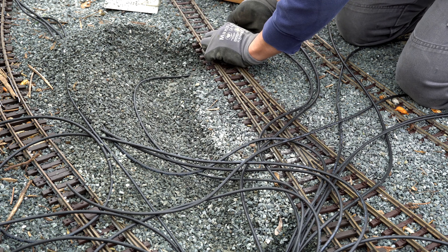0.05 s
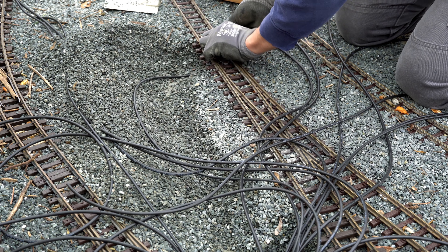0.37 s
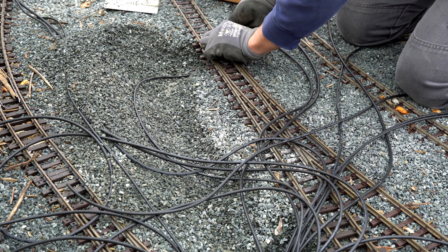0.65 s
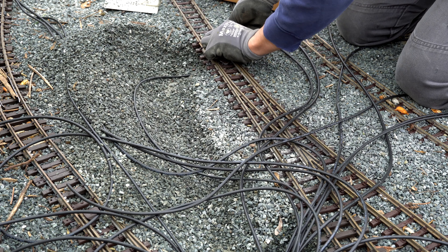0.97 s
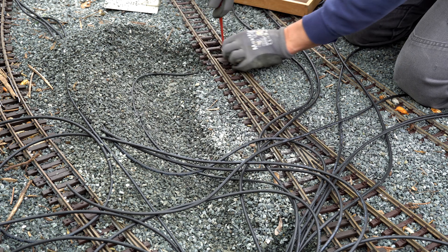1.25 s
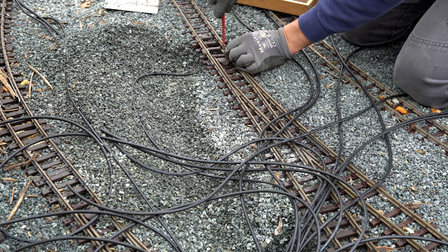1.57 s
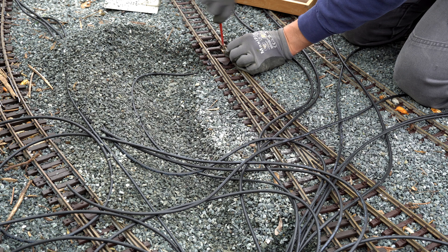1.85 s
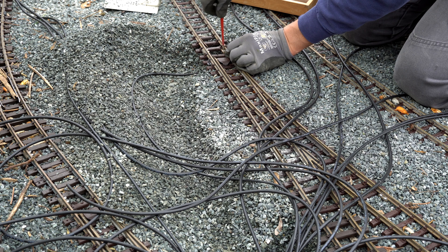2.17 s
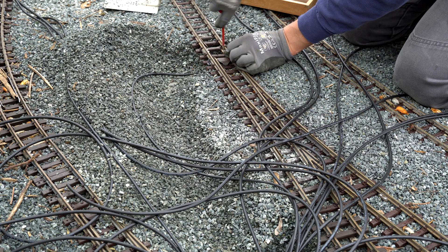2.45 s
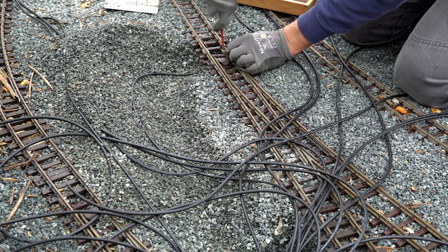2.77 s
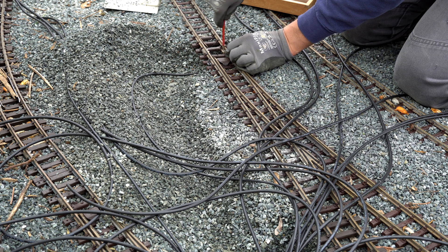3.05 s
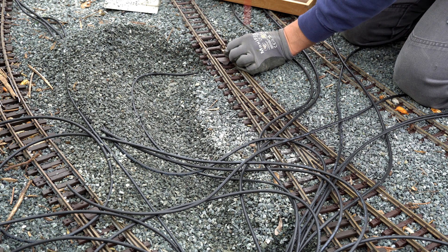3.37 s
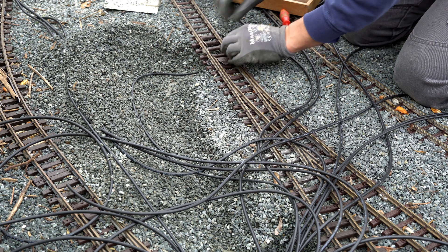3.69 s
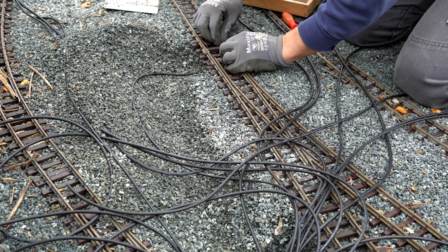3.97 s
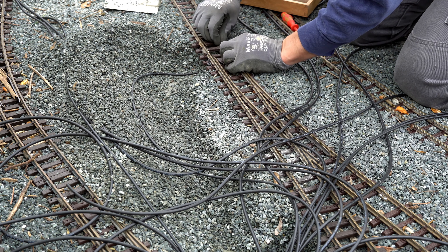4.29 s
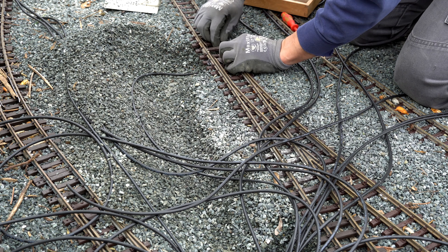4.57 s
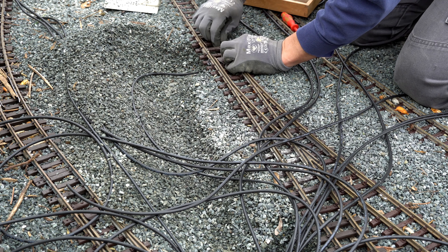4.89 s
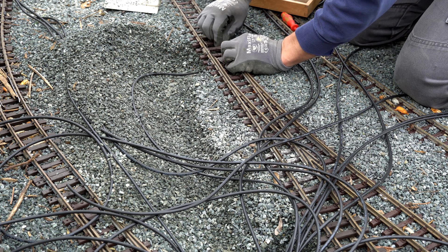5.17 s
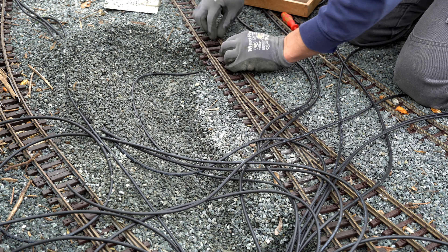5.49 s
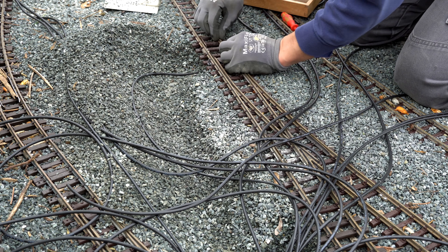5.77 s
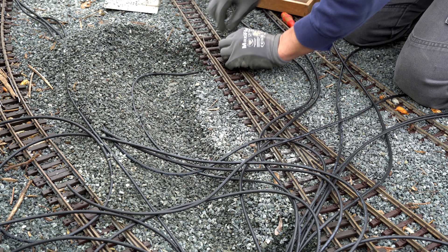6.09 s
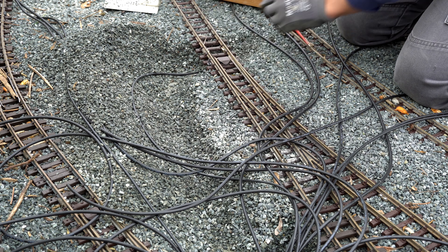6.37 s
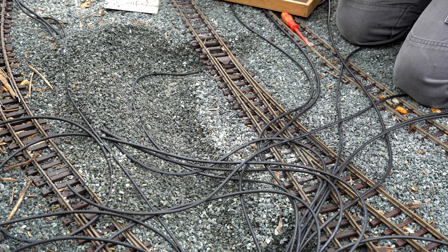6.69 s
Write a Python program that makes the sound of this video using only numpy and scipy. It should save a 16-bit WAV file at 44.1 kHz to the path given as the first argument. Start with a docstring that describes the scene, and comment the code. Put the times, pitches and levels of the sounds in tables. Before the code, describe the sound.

Sparrows chirp while a screw creaks through four turns, then a screwdriver clatters into a wooden tray and gravel clicks softly.

```python
"""Beside a garden railway, one microphone close to the track. Sparrows call from the start, other birds
whistle far off, and gloved fingers stir the ballast as a sleeve brushes past. From 1.6 s a screw is
tightened into the track: four turns, each a stick-slip creak that ends slower. At 3.6 s the screwdriver,
tossed into a wooden tray, lands and bounces. Then fingers click rail and stones again while gusts reach
the microphone."""
import sys
import numpy as np
from scipy import signal
from scipy.fft import rfft, irfft
from scipy.io import wavfile

SR = 44100
rng = np.random.default_rng(int(sys.argv[2]) if len(sys.argv) > 2 else 0)


def store_wav(level_fs):
    """Save 16-bit WAV to argv[1]."""
    pcm = np.round(np.clip(np.atleast_2d(level_fs), -1, 1) * 32767)
    wavfile.write(sys.argv[1], SR, pcm.T.astype(np.int16))


N = 301644
TIME = np.arange(N) / SR

# The garden's hush. Each row: frequency in Hz, relative level in dB.
AIR_COLOUR = [(15, -27), (35, -25), (65, -20.5), (110, -26), (200, -30.5), (400, -34), (700, -35.5),
              (1300, -39), (2500, -43.5), (4000, -49), (5600, -48), (8200, -51.5), (10000, -57.5),
              (16000, -58.5)]
# Its course. Each row: time in seconds, level in dB.
AIR_LEVELS = [(1.0, -51.5), (1.5, -53.5), (3.4, -52), (6.84, -54)]

# Sparrow notes. Each row: seconds into the note, share of the top pitch, relative level in dB.
CHEEP_SHAPE = [(0, .76, -16), (.016, 1, -1), (.028, .98, 0), (.043, .83, -1.5), (.052, .71, -5),
               (.06, .75, -3.5), (.072, .7, -3), (.084, .58, -10)]  # an arch that steps down with one catch
TWEET_SHAPE = [(0, .68, -10), (.035, 0.95, 1), (.09, .92, -7)]  # rises and holds
CHIRRUP_SHAPE = [(0, .62, -16), (.016, .88, -1), (.027, 0.98, -1), (.038, .85, 0.5), (.05, .62, -8),
                 (.057, .74, -1), (.068, .82, -6.5), (.1, 0.57, -13.5)]  # two quick arches
FLICK_SHAPE = [(0, 1, -19.5), (.025, 1.23, -10.5), (.04, 1.36, -26)]  # a high voice leading into chirrups and cheeps
# Calls near the microphone. Each row: start in seconds, top pitch in Hz, level in dB.
CHEEP_CALLS = [(0, 3930, -46), (.125, 4400, -53.5), (0.659, 4400, -42.5), (1.411, 4620, -54),
               (2.843, 4340, -36), (4.055, 4310, -40.5), (4.182, 4960, -52), (5.295, 4450, -58.5),
               (5.405, 4510, -39), (5.628, 4450, -50.5), (5.989, 4160, -38.5)]
TWEET_CALLS = [(.735, 4436, -44), (.756, 3655, -36.5), (1.574, 3400, -43.5), (6.26, 4360, -55),
               (6.342, 4440, -51.5)]
CHIRRUP_CALLS = [(1.866, 4910, -35), (2.265, 4420, -47.5), (3.246, 4850, -34.5), (6.411, 4930, -37.5)]
# Held tones that slide down. Each row: start and length of the slide in seconds, top pitch in Hz,
# fall in octaves per second, level in dB, relative level of the held tone in dB.
SLUR_CALLS = [(0.388, .055, 6050, 12.6, -27.5, -25), (.455, 0.073, 3710, 12.8, -32, -21),
              (0.454, .06, 5760, 8, -41, -20), (1.106, 0.16, 6185, 9.46, -30, -16),
              (2.463, 0.1, 6260, 10.5, -36, -20), (3.56, 0.091, 5730, 11, -36.5, -25),
              (3.822, 0.083, 5400, 12, -52.5, -7), (4.412, .15, 5980, 9.85, -34, -20)]

# Rail and stones under the fingers. Each row: time in seconds, level in dB.
STONE_CLICKS = [(0.016, -29), (0.268, -24.5), (.278, -29.5), (0.4907, -28), (0.9799, -32.5), (1.3812, -39),
                (1.606, -42), (3.2701, -28.5), (3.279, -29.5), (3.285, -28), (3.884, -36), (4.2753, -42.5),
                (4.829, -24), (4.8305, -20), (4.836, -26.5), (4.844, -30.5), (4.863, -37.5), (4.96, -59),
                (4.979, -60), (5.1438, -39.5), (5.5035, -37.5), (5.691, -33)]
# Close movements. Each row: middle in seconds, length in seconds, level in dB.
BALLAST_RUBS = [(.03, 0.45, -54), (.5, 0.46, -60.5), (.95, 0.68, -60), (4.1, 0.62, -58), (4.6, .12, -57.5),
                (4.97, 0.065, -47.5), (5.15, 0.19, -56.5), (5.88, 0.21, -58)]
SLEEVE_MOVES = [(.85, 1.2, -56.5)]
# What is touched. Each row: frequency in Hz, relative level in dB.
STONE_COLOUR = [(100, -11.5), (300, -5), (600, 2.5), (1500, -0.5), (3000, 2.5), (6000, 0.5), (8300, -0.5),
                (9500, -10), (12000, -14.5), (14300, -14), (16000, -24.5)]
GRIT_COLOUR = [(100, -25.5), (300, -8.5), (700, 2.5), (1500, -1), (4000, -6), (8300, -12.5), (9800, -18),
               (16000, -23)]
CLOTH_COLOUR = [(100, -9), (200, 6.5), (400, -4), (1200, -0.5), (2200, -5), (4000, -10), (16000, -46)]

# Birds far off. Each row: start and end in seconds, first and last pitch in Hz, level in dB.
FAR_WHISTLES = [(.5, .76, 2200, 2120, -54.5), (0.783, 1.22, 2450, 2380, -64.5),
                (1.4, 1.64, 2050, 1980, -62), (2.702, 2.828, 5035, 5380, -53),
                (2.92, 3.01, 5264, 5370, -53), (4.024, 4.3, 2290, 2460, -56),
                (5.038, 5.185, 4950, 4960, -56.5), (5.075, 5.208, 2130, 1996, -59.5),
                (5.331, 5.412, 4720, 4390, -50), (5.345, 5.43, 1834, 1690, -57),
                (5.324, 5.43, 2630, 2470, -60), (5.566, 5.686, 2200, 2230, -56.5),
                (6.022, 6.147, 5580, 5620, -62), (6.464, 6.66, 6330, 6160, -62),
                (6.485, 6.581, 5390, 5120, -53.5)]

# Turns of the screw. Each row: start and end in seconds, nominal slips per second at first and at last,
# levels of the breakaway, next and last slips in dB, treble lift in dB, the sleeper's share in dB.
SCREW_TURNS = [(1.639, 1.7076, 1280, 164, -35, -31, -18.5, -7, -10),
               (2.0273, 2.1424, 906, 130, -17.5, -23.5, -9.5, 0.5, -8.5),
               (2.5175, 2.64, 218, 158, -10.5, -14.5, -11.5, 6, -8),
               (3.016, 3.1031, 195, 10.5, -10.5, -18, -13, 5.5, -7)]
# The screw's snap and the sleeper's after-ring. Each row: frequency in Hz, relative level in dB.
SCREW_COLOUR = [(200, -39), (500, -18.5), (750, -15), (2000, -30.5), (2500, -5), (4000, -13), (6900, -11),
                (7600, 3), (8600, 6.5), (9300, 0.5), (10100, -16), (11000, -8.5), (12200, -11.5),
                (13900, -30.5), (15500, -25)]
SLEEPER_COLOUR = [(200, -14), (500, -27), (720, -3), (1200, 0.5), (1900, -0.5), (2500, -4), (4000, -1.5),
                  (6000, 0.5), (9000, -5.5), (10500, -1), (12200, -6), (14000, -9), (16000, -16)]

# The screwdriver lands. Each row: time in seconds, level in dB, treble cutoff in Hz, shaft tick in dB.
TOOL_BOUNCES = [(3.5993, 2.5, 4800, -18.5), (3.602, -3.5, 3450, -14), (3.613, -7, 2490, -20),
                (3.669, -9.5, 1130, -20), (3.7255, -18.5, 825, -40), (3.736, -21.5, 1015, -37),
                (3.7589, -24, 1100, -42), (3.78, -39, 1016, -49), (3.811, -25.5, 890, -48),
                (3.844, -29.5, 690, -50), (3.9036, -31.5, 860, -44.5), (3.9621, -35, 600, -58),
                (4.0108, -19.5, 2230, -27), (4.036, -36, 1480, -39), (4.0538, -32, 1800, -38.5)]
# Wooden tray and steel shaft ring. Each row: frequency in Hz, relative level in dB, t60 in seconds.
WOOD_MODES = [(628.5, -23.5, 0.26), (787, -13.5, 0.11), (868, -5.5, 0.069), (1125, -6.5, 0.077),
              (1238, -7, 0.048), (1394, -3, 0.066), (1747, 7, 0.022), (1997, -8, 0.081), (2400, -4, 0.055),
              (2560, -7, 0.076), (2886, 5, 0.013), (3140, -13.5, .05), (3663, -3.5, 0.06),
              (4400, -9.5, 0.071)]
STEEL_MODES = [(7750, -2, .35), (11100, -3, .3), (15000, -2, .25)]
# Clatter on the tray. Each row: frequency in Hz, relative level in dB.
TRAY_COLOUR = [(60, -15.5), (170, -31.5), (240, -12), (330, -34), (450, -12), (700, 1), (1050, 6),
               (1900, 0.5), (2800, 0), (4500, -8.5), (8000, -24), (11000, -40), (16000, -44.5)]

# Wind on the microphone. Each row: middle in seconds, length in seconds, level in dB.
MIC_GUSTS = [(4.12, .8, -37.5), (4.36, 0.58, -32.5), (5.08, 1.29, -28), (6.0, 1.38, -27), (6.62, 0.54, -28)]
# Its rumble. Each row: frequency in Hz, relative level in dB.
GUST_COLOUR = [(2, -17), (7, -2.5), (14, 0.5), (30, -18.5), (60, -30.5), (120, -35), (300, -73),
               (1000, -100)]


def gain_of(db):
    """Decibels to gain."""
    return 10 ** (np.asarray(db) / 20)


def evened(x):
    """Scales to rms 1."""
    return x / np.sqrt(np.mean(x ** 2) + 1e-20)


def unit_hit(x):
    """Scales a hit to the energy of one millisecond at rms 1."""
    return x * np.sqrt(SR / 1000 / np.sum(x ** 2))


def spectrum(points, size):
    """Gains of a (Hz, dB) table on the bins of an FFT."""
    hz, db = np.transpose(points)
    return gain_of(np.interp(np.log(np.fft.rfftfreq(size, 1 / SR) + 1), np.log(hz + 1), db))


def noise(points):
    """Steady noise with the given spectrum, at rms 1."""
    return evened(irfft(rfft(rng.standard_normal(N)) * spectrum(points, N), N))


def wander(t, per_s):
    """A smooth random curve of rms 1."""
    return evened(signal.resample(rng.standard_normal(int((t[-1] - t[0]) * per_s) + 3), len(t)))


def swells(rows):
    """Gain over time of events that each rise and fall smoothly."""
    return sum(gain_of(db) * np.cos(np.pi * np.clip((TIME - middle) / length, -.5, .5)) ** 2
               for middle, length, db in rows)


def add(mix, s, sound):
    """Mixes a sound in at s seconds."""
    part = mix[max(round(s * SR), 0):][:len(sound)]
    part += sound[:len(part)]


def impact(colour, t60, scatter_db, spread_s=0.000698, size=4096):
    """A causal pulse of the given colour, followed by the dense dying ring of the struck thing."""
    cepstrum = irfft(np.log(spectrum(colour, size)))
    cepstrum[1:size // 2] *= 2
    cepstrum[size // 2 + 1:] = 0
    # bending waves are dispersive: the treble arrives first
    lag = 2 * np.pi * np.cumsum(np.linspace(spread_s, 0, size // 2 + 1)) * SR / size
    pulse = irfft(np.exp(rfft(cepstrum) - 1j * lag))
    ring = rng.standard_normal(size) * gain_of(-60 * np.arange(size) / SR / t60)
    ring *= gain_of(scatter_db) / np.linalg.norm(ring)
    ring[0] = 1
    return unit_hit(signal.fftconvolve(pulse, ring)[:size])


def garden(x, t60, build_s):
    """Scattered reflections reach the microphone from fences, walls and shrubs."""
    t = np.arange(SR) / SR
    taps = rng.standard_normal(SR) * (rng.random(SR) < .06)
    taps *= np.minimum(t / build_s, 1) ** 2 * gain_of(-60 * t / t60)
    return signal.oaconvolve(x, taps / np.linalg.norm(taps))[:N]


def air():
    """The hush of the garden all round, drifting a little in level."""
    return gain_of(np.interp(TIME, *np.transpose(AIR_LEVELS))) * noise(AIR_COLOUR)


def note(shape, pitch=1, flutter_db=3, overtone_db=-31):
    """A gliding whistle with a fast, uneven waver; the other side of the syrinx sings a little lower."""
    s, course, db = np.transpose(shape)
    t = np.arange(s[0], s[-1], 1 / SR)
    sound = np.zeros(len(t))
    for ratio, voice_db in ((1, 0), (.9, -15)):
        waver = 1 + .019 * wander(t, per_s=400)
        phase = 2 * np.pi * np.cumsum(pitch * ratio * np.interp(t, s, course) * waver) / SR
        loudness = gain_of(voice_db + np.interp(t, s, db) + flutter_db * wander(t, per_s=250))
        sound += loudness * (np.sin(phase) + gain_of(overtone_db) * np.sin(2 * phase))
    return sound * signal.windows.tukey(len(t), .12)


def slur(hold_s, length, top_hz, octaves_per_s, hold_db, swell_s=0.011, sag_db=-1.5, tail_db=-15.5):
    """Rows of seconds, Hz and dB for a note held softly, then sliding down as it swells and dies."""
    t = np.linspace(-hold_s, length, 60)
    hz = top_hz * 2 ** (-octaves_per_s * np.maximum(t, 0))
    db = np.interp(t, [0, swell_s, length / 2, length], [hold_db, 0, sag_db, tail_db])
    return np.transpose([t + hold_s, hz, db])


def sparrows(hold_s=0.075, flick_lead_s=0.019):
    """Sparrows near the microphone repeat slurs, chirrups, cheeps and tweets."""
    out = np.zeros(N)
    for s, length, top_hz, octaves_per_s, db, hold_db in SLUR_CALLS:
        add(out, s - hold_s, gain_of(db) * note(slur(hold_s, length, top_hz, octaves_per_s, hold_db)))
    kinds = (CHIRRUP_SHAPE, CHIRRUP_CALLS), (CHEEP_SHAPE, CHEEP_CALLS), (TWEET_SHAPE, TWEET_CALLS)
    for shape, calls in kinds:
        for s, top_hz, db in calls:
            add(out, s, gain_of(db) * note(shape, top_hz, flutter_db=5))
    for s, top_hz, db in CHIRRUP_CALLS + CHEEP_CALLS:
        add(out, s - flick_lead_s, gain_of(db) * note(FLICK_SHAPE, top_hz))
    return out


def flock(low_hz=3700, high_hz=5200, notes=80, level_db=-58):
    """More sparrows farther off sing the same kinds of note, each at its own pitch."""
    out, shapes = np.zeros(N), (CHIRRUP_SHAPE, CHEEP_SHAPE, TWEET_SHAPE)
    for k in range(notes):
        s = (k + rng.random()) * N / SR / notes
        shape = shapes[rng.integers(len(shapes))]
        add(out, s, evened(note(shape, rng.uniform(low_hz, high_hz))))
    return gain_of(level_db) * evened(out + gain_of(0.5) * garden(out, t60=0.13, build_s=0.0045))


def ballast(grains_per_s=160, spread_db=3, grain_kinds=12, settling_db=-64.5):
    """Close by, gloved fingers click rail and stones and stir a soft crunch of small grains."""
    clicks, crunch = np.zeros(N), np.zeros(N)
    for s, db in STONE_CLICKS:
        treble_db = 0.18 * (db + 41.5)  # a harder click is brighter
        colour = [(hz, stone_db + treble_db * (hz > 7000)) for hz, stone_db in STONE_COLOUR]
        add(clicks, s, gain_of(db) * impact(colour, t60=0.02, scatter_db=14))
    for _ in range(grain_kinds):
        contacts = rng.random(N) < grains_per_s / grain_kinds / SR
        force = gain_of(spread_db * np.minimum(rng.exponential(1, N), 3))
        crunch += signal.oaconvolve(contacts * force, impact(GRIT_COLOUR, t60=.03, scatter_db=15))[:N]
    # grains also settle under the kneeling weight all along
    return clicks + (gain_of(settling_db) + swells(BALLAST_RUBS)) * evened(crunch)


def sleeve(patchy_db=2):
    """Cloth rustles unevenly as the arm shifts its grip."""
    return swells(SLEEVE_MOVES) * gain_of(patchy_db * wander(TIME, per_s=50)) * noise(CLOTH_COLOUR)


def far_birds(waver=0.0087, flutter_db=3):
    """Thin, nearly level whistles carry in from a distance."""
    out = np.zeros(N)
    for start, end, first_hz, last_hz, db in FAR_WHISTLES:
        t = np.arange(start, end, 1 / SR)
        hz = np.linspace(first_hz, last_hz, len(t)) * (1 + waver * wander(t, per_s=400))
        loudness = gain_of(db + flutter_db * wander(t, per_s=64)) * signal.windows.tukey(len(t), .5)
        add(out, start, loudness * np.sin(2 * np.pi * np.cumsum(hz) / SR))
    return out


def screw(uneven_db=1.4, waver=0.021, run_up_s=.011, treble_hz=9900, contacts=6, hop_per_s=340):
    """The thread sticks and slips; each slip snaps the screw and shakes the sleeper."""
    out = np.zeros(N)
    for start, end, first_rate, last_rate, *levels in SCREW_TURNS:
        breakaway_db, next_db, last_db, treble_db, sleeper_db = levels
        t = np.arange(start, end, 1 / SR)
        rate = last_rate + (first_rate - last_rate) * np.linspace(1, 0, len(t)) ** 1.1
        rate *= 1 - .25 * np.exp((start - t) / run_up_s)
        rate *= 1 + waver * wander(t, per_s=55)
        cycles = np.cumsum(rate) / SR
        # a turn begins and ends on a slip
        slips = np.interp(np.linspace(0, cycles[-1], round(cycles[-1]) + 1), cycles, t)
        slip_db = np.r_[breakaway_db, np.interp(slips[1:], [start, end], [next_db, last_db])]
        colour = [(hz, db + treble_db * (hz > treble_hz)) for hz, db in SCREW_COLOUR]
        snap = impact(colour, t60=0.0029, scatter_db=-9, spread_s=.0009)
        thud = gain_of(sleeper_db) * impact(SLEEPER_COLOUR, t60=.025, scatter_db=1)
        # each point of contact on the thread rings a little differently; quick slips mostly stay on one
        rings = [gain_of(-9) * impact(colour, t60=0.0058, scatter_db=32.5)
                 + gain_of(-5) * impact(colour, t60=0.031, scatter_db=32) for _ in range(contacts)]
        contact = 0
        chances, unevenness = rng.random((200, 2)), rng.standard_normal(200)
        for s, db, (hop, place), uneven in zip(slips, slip_db, chances, unevenness):
            if hop < (hop_per_s / np.interp(s, t, rate)) ** 2:
                contact = int(place * contacts)
            add(out, s, gain_of(db + uneven_db * uneven) * (unit_hit(snap + rings[contact]) + thud))
    return out


def screwdriver(ping_db=-42, detune=0.01):
    """The handle bounces in the tray; soft blows reach only low modes, and the shaft ticks and pings."""
    out, t = np.zeros(N), np.arange(SR // 3) / SR
    ping = sum(gain_of(db - 60 * t / t60) * np.sin(2 * np.pi * hz * t) for hz, db, t60 in STEEL_MODES)
    for s, db, cutoff_hz, tick_db in TOOL_BOUNCES:
        ring = np.zeros(len(t))
        for hz, mode_db, t60 in WOOD_MODES:
            sign = rng.choice([-1, 1])
            hz *= 1 + detune * rng.uniform(-1.4, 1)  # the tool's weight shifts the modes at each blow
            ring += sign * gain_of(mode_db - 60 * t / t60) * np.sin(2 * np.pi * hz * t)
        clatter = impact(TRAY_COLOUR, t60=0.028, scatter_db=0, size=len(t))
        blow = signal.lfilter(*signal.butter(2, cutoff_hz, fs=SR), unit_hit(ring) + clatter)
        tick = impact(STONE_COLOUR, t60=0.026, scatter_db=17, size=len(t))
        add(out, s, gain_of(db) * unit_hit(blow) + gain_of(tick_db) * (tick + gain_of(ping_db) * ping))
    return out


def rattle(level_db=-38.5, t60=0.72, contacts_per_s=1300):
    """Loose things in the tray chatter after the first blow and settle."""
    since = TIME - TOOL_BOUNCES[0][0]
    contacts = (rng.random(N) < contacts_per_s / SR) * rng.standard_normal(N)
    chatter = evened(signal.oaconvolve(contacts, impact(TRAY_COLOUR, t60=.03, scatter_db=10.5))[:N])
    return (since > 0) * gain_of(level_db - 60 * abs(since) / t60) * chatter


def gusts():
    """Wind buffets the microphone in low swells."""
    return swells(MIC_GUSTS) * noise(GUST_COLOUR)


def scene():
    """In mono: the track work close and almost dry, the birds set back in the garden, air and wind."""
    work = screw() + screwdriver() + rattle() + ballast() + sleeve()
    near, far = sparrows(), far_birds()
    early_echoes = gain_of(-7.5) * garden(near, t60=0.29, build_s=0.014)
    late_echoes = gain_of(-24.5) * garden(near, t60=0.31, build_s=0.088)
    far_echoes = gain_of(-6.5) * garden(far, t60=0.77, build_s=0.033)
    birds = near + early_echoes + late_echoes + far + far_echoes + flock()
    outdoors = birds + air() + gusts()
    work_echoes = gain_of(-32.5) * garden(work, t60=0.41, build_s=0.012)
    return (work + work_echoes + outdoors)[None]


def record(dry, edge_hz=15900):
    """The loudest blow overloads the microphone input; then the highest treble is cut."""
    lowpass = signal.firwin(255, edge_hz, window=("kaiser", 8), fs=SR)
    return signal.oaconvolve(np.clip(dry, -1, 1), lowpass[None], "same")


dry = scene()
out = record(dry)
store_wav(out)
```